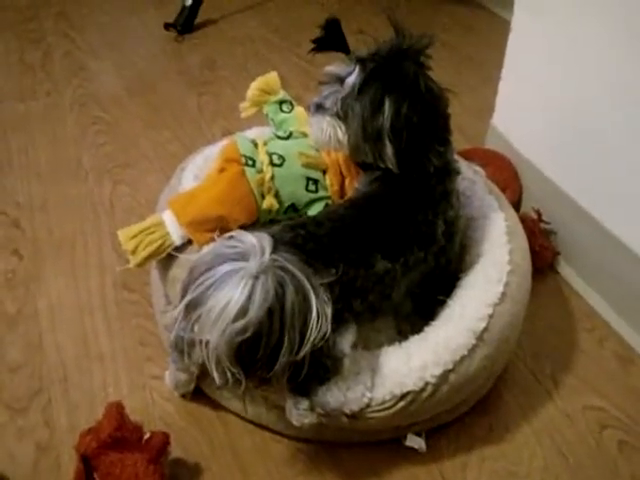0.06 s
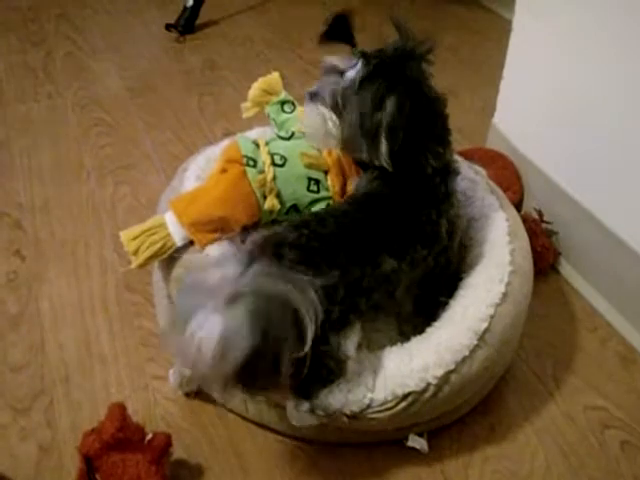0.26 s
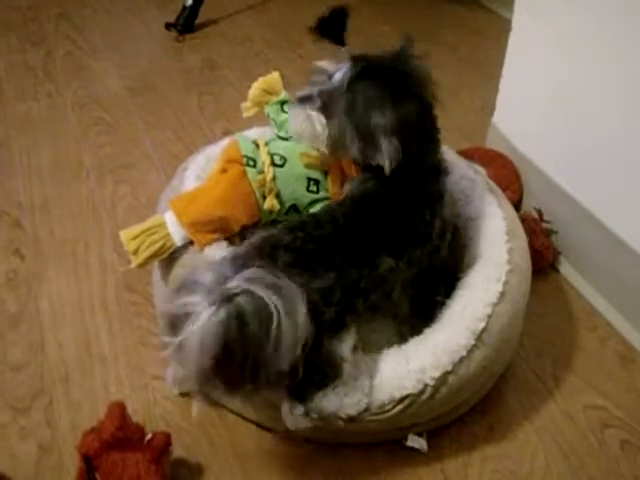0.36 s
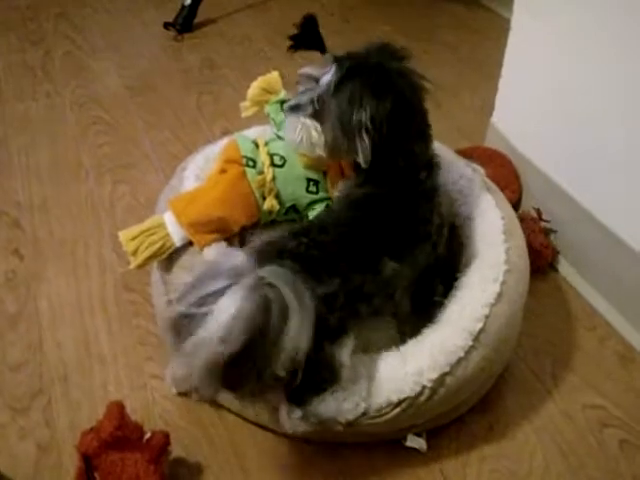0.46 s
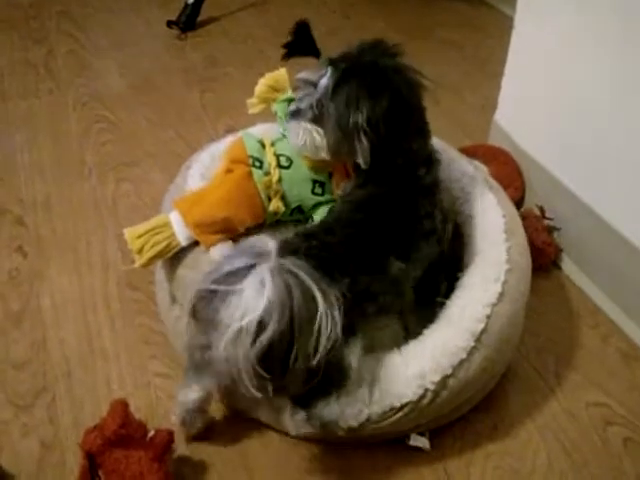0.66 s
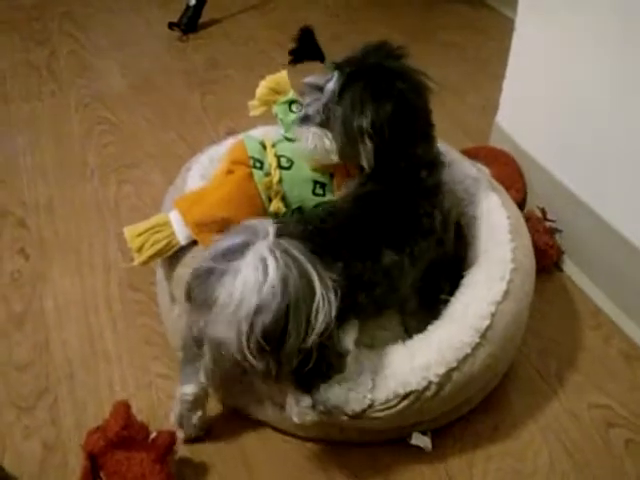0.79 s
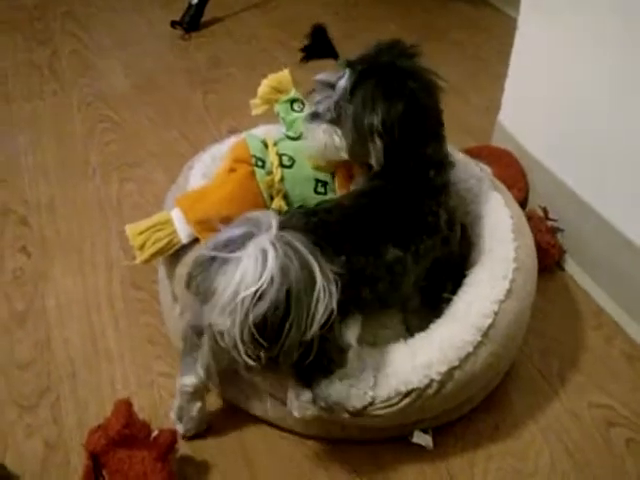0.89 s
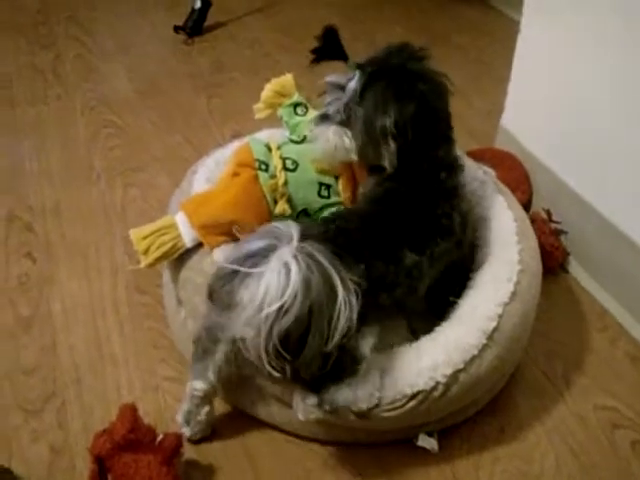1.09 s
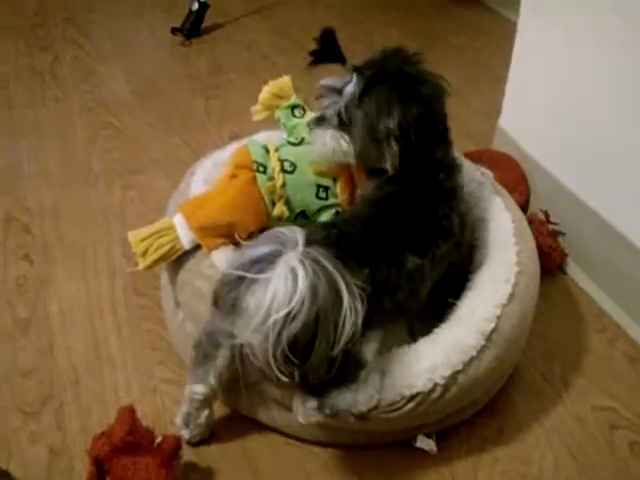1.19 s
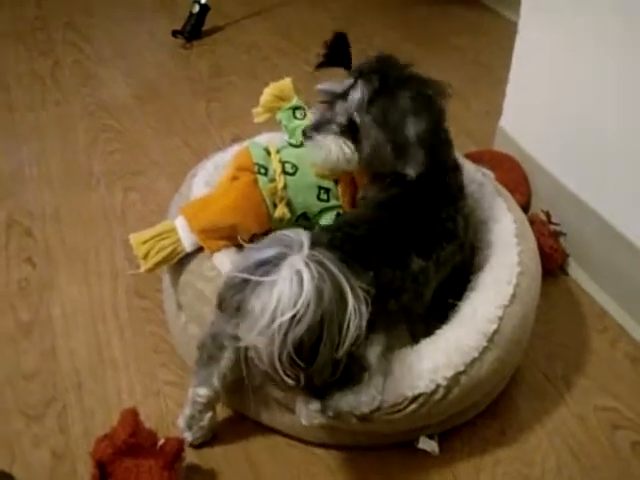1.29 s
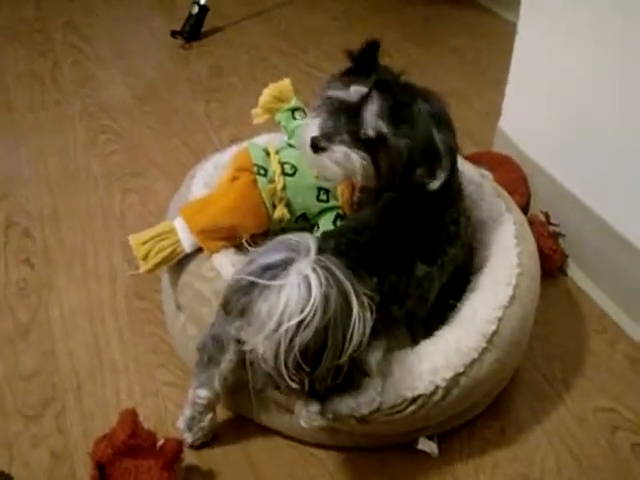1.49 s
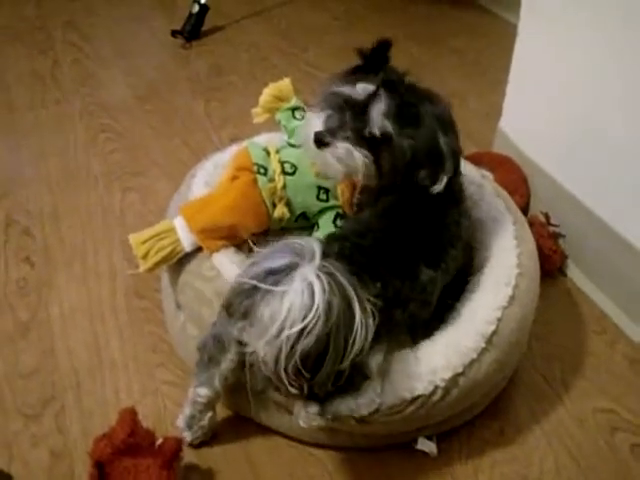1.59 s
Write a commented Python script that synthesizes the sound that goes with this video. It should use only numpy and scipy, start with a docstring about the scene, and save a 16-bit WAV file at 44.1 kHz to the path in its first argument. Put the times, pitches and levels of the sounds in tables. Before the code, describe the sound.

A small dog barks once, sharp and rough, just after a soft rustle and thud in its cushioned bed. The bare room rings briefly, then the bedding stirs faintly as the dog settles.

```python
"""A small dog gives one sharp, rough bark from its cushioned bed in a bare, wood-floored room.
Vocal-fold pulses and breath noise excite the resonances of mouth and throat: a low grunt opens to a
bright yap and ends on a brief clean note. The room rings on; a gain control ducks and recovers.
The bedding rustles and thuds as the dog shifts before the bark, and stirs faintly as it settles."""
import sys
import numpy as np
from scipy import signal
from scipy.fft import rfft, irfft
from scipy.io import wavfile
from scipy.ndimage import uniform_filter1d, minimum_filter1d

SR = 44100
rng = np.random.default_rng(int(sys.argv[2]) if len(sys.argv) > 2 else 0)


def unload_audio(sound):
    """Save the sound as a 16-bit wav file, at the path given as the first command line argument."""
    columns = np.transpose(np.atleast_2d(sound))
    # keep every value between -1 and 1, then stretch to whole-number steps
    steps = np.round(np.clip(columns, -1, 1) * 32767)
    wavfile.write(sys.argv[1], SR, steps.astype(np.int16))


N = 72765
T = np.arange(N) / SR

# Room tone. Each row: frequency in Hz, relative spectral density in dB.
FLOOR_SPECTRUM = [(10, -15.5), (25, -1.5), (60, -3), (100, -7.5), (180, -15), (280, -14), (500, -16.5),
                  (1200, -24.5), (2000, -26), (5000, -30.5), (15000, -33.5)]
# Fur on fabric. Each row: time in seconds, level in dB.
RUSTLE_LEVEL = [(0, -50), (.03, -45.5), (.065, -41.5), (.11, -43), (.15, -45.5), (.19, -49), (.3, -72),
                (.96, -74.5), (1.09, -61), (1.25, -61), (1.32, -68.5), (1.43, -73), (1.48, -61),
                (1.54, -68.5), (1.65, -87)]
# Colour of the rustle. Each row: frequency in Hz, relative spectral density in dB.
FABRIC_SPECTRUM = [(30, -14), (130, -3.5), (260, 0), (480, -6), (900, 2), (1300, 2), (1750, -12.5),
                   (2500, -6), (4000, -17), (7700, -25.5), (9000, -24.5), (15000, -29.5)]
# Cushion thuds. Each row: time in seconds, level in dB.
CUSHION_LEVEL = [(0, -57), (.04, -47), (.065, -38), (.1, -38.5), (.16, -51.5), (.22, -40.5), (.27, -52),
                 (.35, -81.5)]
# Paw pats. Each row: time of the peak in seconds, level in dB.
PAW_PATS = [(1.07, -59.5), (1.125, -58.5), (1.175, -55.5), (1.22, -58)]
# Reverberation time. Each row: frequency in Hz, seconds to decay by 60 dB.
REVERB_T60 = [(150, 0.27), (400, 0.6952), (700, 0.4313), (1000, 0.5824), (3000, 0.6366), (5000, 0.46),
              (9000, .5), (14000, 0.22)]
# Colour of the reverberation. Each row: frequency in Hz, relative gain in dB.
REVERB_SPECTRUM = [(100, -14), (330, -12), (450, -2), (545, -14), (600, -3.5), (645, -9.5), (705, 5.5),
                   (790, -1), (880, 5), (975, 1.5), (1080, -2.5), (1170, 4.5), (1300, -2), (3000, 3),
                   (4200, -4.5), (5200, 10.5), (6500, 1.5), (8800, 15), (11000, 9.5), (15000, 0.5)]
# Clean note in the bark. Each row: time in seconds, pitch in Hz, level in dB.
NOTE_CONTOUR = [(.222, 800, -32.5), (.232, 844, -2.5), (.241, 846.8, -20.5), (.268, 924.3, -9),
                (.288, 956, -7.5), (.314, 966, -12.5), (.324, 953, 1.5), (.332, 995, 2), (.339, 961, -40.5)]
# Chest grunt. Each row: time in seconds, level in dB.
GRUNT_LEVEL = [(.195, -38), (.208, -59), (.216, -22), (.228, -30), (.245, -31), (.27, -48.5), (.29, -81.5)]
# Upper throat resonances. Each row: frequency in Hz, relative gain in dB.
THROAT_SPECTRUM = [(300, -55.5), (1000, -30), (1270, -2.5), (1490, 5), (1590, -2), (1700, -6.5),
                   (2150, -0.5), (2370, -10), (2850, -3.5), (3100, -8.5), (3500, -26), (4600, -32),
                   (5150, -32), (5800, -46.5), (7600, -43), (8700, -34), (9900, -41.5), (10900, -35.5),
                   (12500, -49), (16000, -54.5)]
# Second formant, rising as the jaw drops. Each row: time in seconds, frequency in Hz,
# level in dB relative to the first formant.
JAW_FORMANT = [(.218, 1470, -26.5), (.224, 1697, -7.5), (.238, 1765, -12), (.254, 2038, -12),
               (.275, 1837, -29.5), (.305, 1712, -10.5), (.33, 1670, -14.5)]
# The bark. Each row: time in seconds, level in dB, pitch in Hz, first formant in Hz.
BARK_CONTOUR = [(.198, -51, 220.5, 450), (.214, -37.5, 278.5, 530), (.221, -11, 298.8, 613),
                (.231, -8, 310, 755), (.255, -3.5, 321, 792.6), (.285, -5, 343.9, 846),
                (.305, -13.5, 352.5, 874), (.33, -8.5, 352.1, 888), (.35, -42, 329, 850)]


def amp(db):
    """Decibels as an amplitude ratio."""
    return 10 ** (np.asarray(db) / 20)


def unit(x):
    """Normalisation to rms 1."""
    return x / np.sqrt(np.mean(x ** 2) + 1e-20)


def steady(x, size=500):
    """Division by the running rms flattens the envelope."""
    return x / np.sqrt(abs(uniform_filter1d(x ** 2, size)) + 1e-12)


def curves(table):
    """Linear interpolation of each column over time."""
    s, *columns = np.transpose(table)
    return [np.interp(T, s, c) for c in columns]


def read(points, hz):
    """Interpolation on a log-frequency axis."""
    f, value = np.transpose(points)
    return np.interp(np.log(hz + 1), np.log(f), value)


def colour(x, points):
    """Filtering by multiplication of spectra."""
    return irfft(rfft(x) * amp(read(points, np.fft.rfftfreq(N, 1 / SR))), N)


def resonate(x, hz, width_hz, stages):
    """Resonators in cascade, each width_hz wide, follow the centre frequency hz."""
    carrier = np.exp(2j * np.pi * np.cumsum(hz * np.ones(N)) / SR)
    pole = np.exp(-np.pi * width_hz / SR)
    for _ in range(stages):
        x = 2 * (carrier * signal.lfilter([1 - pole], [1, -pole], x / carrier)).real
    return x


def wobble():
    """Smoothed noise: a quick drift of rms 1."""
    return unit(uniform_filter1d(rng.standard_normal(N), 120))


def during(table):
    """A soft gate over the span of a time table."""
    return uniform_filter1d(1. * (T > table[0][0]) * (T < table[-1][0]), size=100)


def opening(start_s, rise_s):
    """A linear ramp from shut to open."""
    return np.clip((T - start_s) / rise_s, 0, 1)


def room_tone(level_db=-54):
    """Stationary noise: low rumble and faint hiss."""
    return amp(level_db) * unit(colour(rng.standard_normal(N), FLOOR_SPECTRUM))


def rustle(grain_db=2):
    """Friction noise: fur brushes the fabric in small grains."""
    grains = rng.standard_normal(N) * amp(grain_db * wobble())
    return unit(colour(grains, FABRIC_SPECTRUM)) * amp(curves(RUSTLE_LEVEL)[0])


def cushion():
    """Damped resonance: the cushion thuds under the shifting weight."""
    thud = resonate(rng.standard_normal(N), hz=51.5, width_hz=35, stages=2)
    return steady(thud, size=2400) * amp(curves(CUSHION_LEVEL)[0])


def pats(spread_s=0.011):
    """Soft impact: a paw on the cushion gives Gaussian bursts of low, narrow-band noise."""
    envelope = sum(amp(db - 3.5 * ((T - s) / spread_s) ** 2) for s, db in PAW_PATS)
    bump = resonate(rng.standard_normal(N), hz=256.8, width_hz=88, stages=2)
    return envelope * steady(bump, size=1200)


def reverberation(x, gain_db=0.5):
    """Convolution with dense reflections that build quickly and decay exponentially, band by band."""
    hz, t, bands = signal.stft(steady(rng.standard_normal(N)), SR, nperseg=512)
    decay = amp(-60 * t / read(REVERB_T60, hz)[:, None])
    tail = signal.istft(bands * decay, SR, nperseg=512)[1][:N]
    tail = colour(tail, REVERB_SPECTRUM) * opening(start_s=0.0061, rise_s=.012) * (T < 1)
    return amp(gain_db) * signal.fftconvolve(x, tail / np.linalg.norm(tail))[:N]


def clean_note(jitter=0.013, octave_db=-24):
    """Nearly sinusoidal oscillation: a rising squeal breaks through the rough voice."""
    hz, level_db = curves(NOTE_CONTOUR)
    phase = 2 * np.pi * np.cumsum(hz * (1 + jitter * wobble())) / SR
    envelope = amp(level_db) * during(NOTE_CONTOUR)
    envelope = uniform_filter1d(uniform_filter1d(envelope, size=130), size=130)
    return unit(np.sin(phase) + amp(octave_db) * np.sin(2 * phase)) * envelope


def vocal_folds(cycles, roughness=0.55, puff_cycles=0.44):
    """Glottal source: each cycle releases a harmonic pulse and a decaying puff of turbulent air."""
    pulses = sum(np.cos(2 * np.pi * k * cycles) for k in range(1, 44))
    puffs = (0.283 + np.exp(-(cycles % 1) / puff_cycles)) * rng.standard_normal(N)
    return (1 - roughness) * unit(pulses) + roughness * unit(puffs)


def mouth(source, first_hz):
    """Formants: two moving resonances of the mouth shape the vowel."""
    first = resonate(source, first_hz, width_hz=600, stages=4)
    first = signal.sosfilt(signal.butter(4, [560, 1170], "band", fs=SR, output="sos"), first)
    second_hz, second_db = curves(JAW_FORMANT)
    second = resonate(source, second_hz, width_hz=199, stages=3)
    return steady(first) + amp(second_db) * steady(second)


def throat(source, relative_db=-6.5, split_hz=1700):
    """Cavity resonances sound as the upper throat opens, the treble rising more gradually."""
    full = steady(colour(source, THROAT_SPECTRUM)) * amp(relative_db)
    treble = signal.sosfiltfilt(signal.butter(6, split_hz, "high", fs=SR, output="sos"), full)
    lower = (full - treble) * opening(start_s=0.2264, rise_s=0.008)
    return lower + treble * opening(start_s=0.2207, rise_s=.022)


def bark(jitter=.03, octave_db=-4.5):
    """Source and filter: jittered folds drive mouth and throat, over a chest grunt on the fundamental."""
    level_db, pitch_hz, formant_hz = curves(BARK_CONTOUR)
    cycles = np.cumsum(pitch_hz * (1 + jitter * wobble())) / SR
    source = vocal_folds(cycles)
    octave = amp(octave_db) * unit(np.sin(2 * np.pi * 2 * cycles))
    yap = mouth(source, formant_hz) + octave + throat(source)
    grunt = amp(curves(GRUNT_LEVEL)[0]) * unit(np.sin(2 * np.pi * cycles)) * during(GRUNT_LEVEL)
    return yap * amp(level_db) * during(BARK_CONTOUR) + grunt


def scene():
    """Superposition of the dog's voice, its reflections, the bed and the room tone."""
    voice, squeal = bark(), clean_note()
    reflections = reverberation(voice + amp(-11) * squeal)
    return (voice + squeal + reflections + rustle() + cushion() + pats() + room_tone())[None]


def record(dry, threshold_db=-13, share=0.79, sense_s=0.0029, hold_s=0.045, cutoff_hz=15800):
    """Compression: gain falls by a share of the excess level; modulation noise and a low-pass follow."""
    x = dry[0]
    pole = np.exp(-1 / (sense_s * SR))
    power = signal.lfilter([1 - pole], [1, -pole], x ** 2)
    excess_db = np.maximum(10 * np.log10(power + 1e-12) - threshold_db, 0)
    half = int(hold_s * SR / 2)
    held_db = -minimum_filter1d(-excess_db, 2 * half + 1, origin=half, mode="constant")
    fall_db = T * 58.5  # after the hold, the excess falls linearly in dB and the gain recovers
    released_db = np.maximum.accumulate(held_db + fall_db) - fall_db
    x = x / amp(share * uniform_filter1d(released_db, size=100))
    x = x + amp(-33.5) * x * rng.standard_normal(N)  # faint hash in proportion to the signal
    low_pass = signal.firwin(511, cutoff_hz, window=("kaiser", 9), fs=SR)
    return signal.oaconvolve(x, low_pass, "same")[None]


dry = scene()
out = record(dry)
unload_audio(out)
```